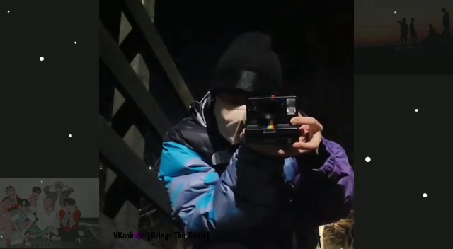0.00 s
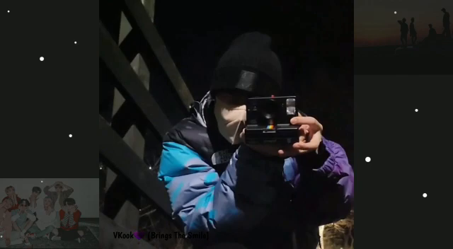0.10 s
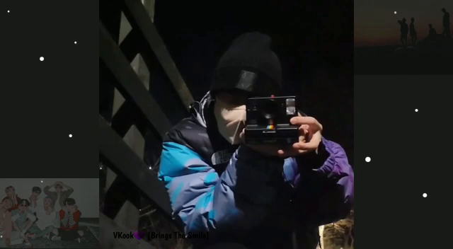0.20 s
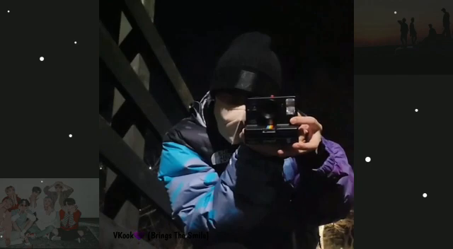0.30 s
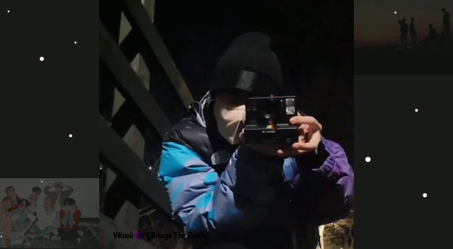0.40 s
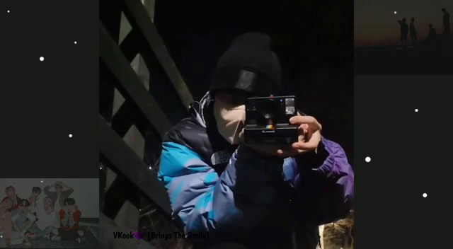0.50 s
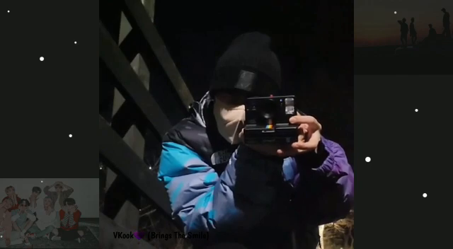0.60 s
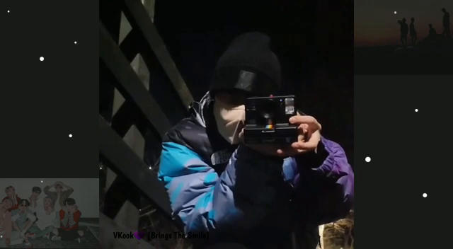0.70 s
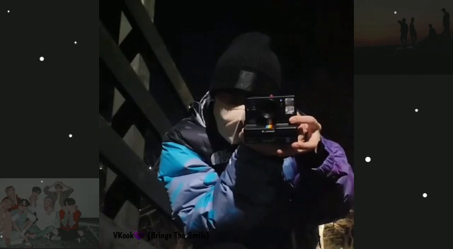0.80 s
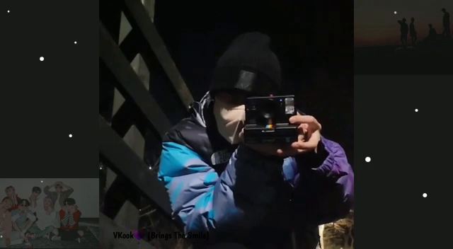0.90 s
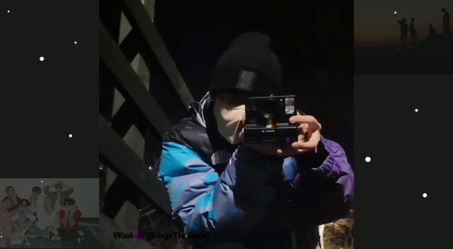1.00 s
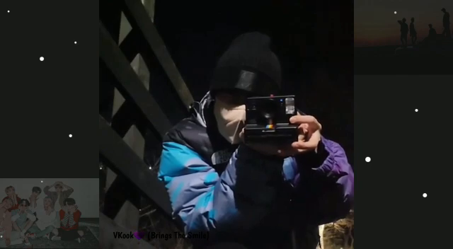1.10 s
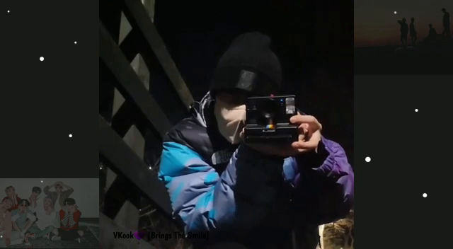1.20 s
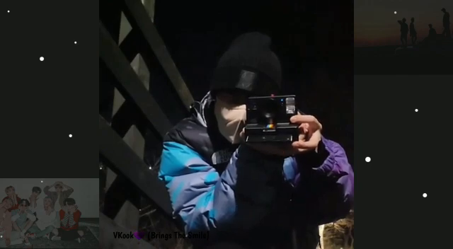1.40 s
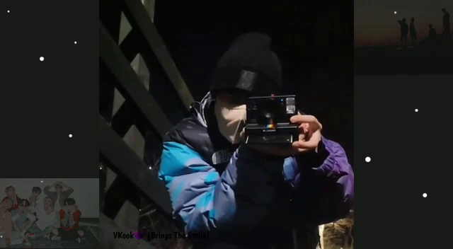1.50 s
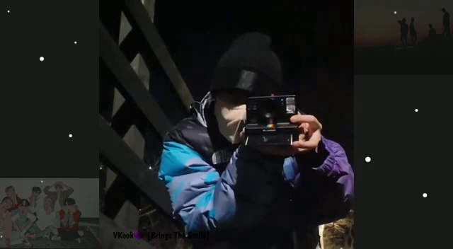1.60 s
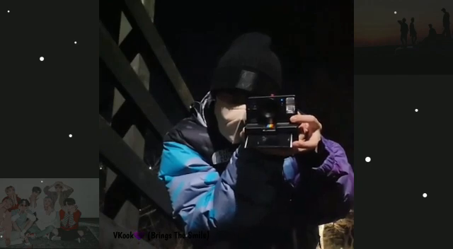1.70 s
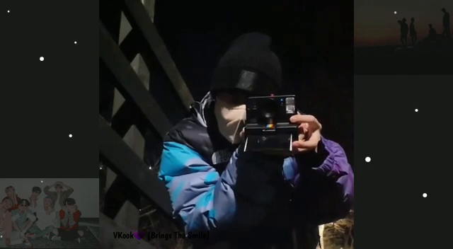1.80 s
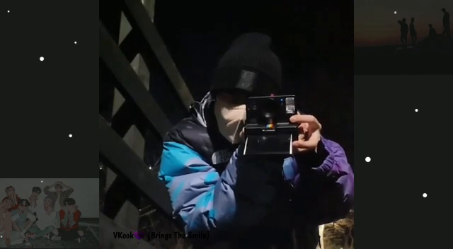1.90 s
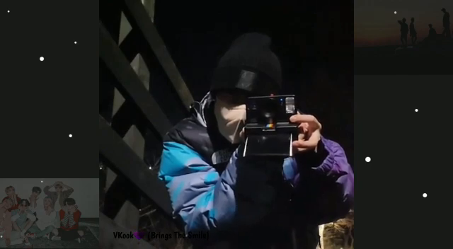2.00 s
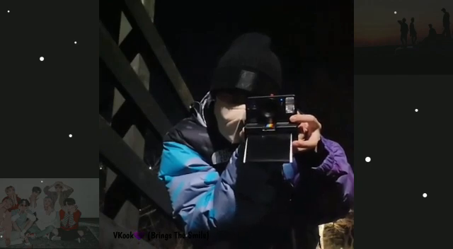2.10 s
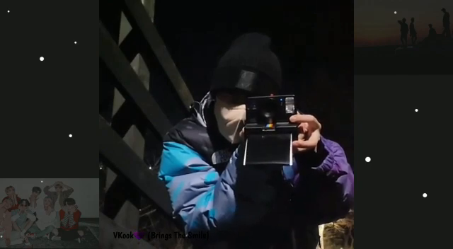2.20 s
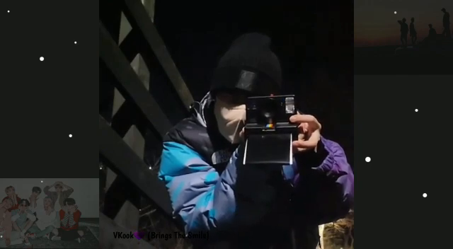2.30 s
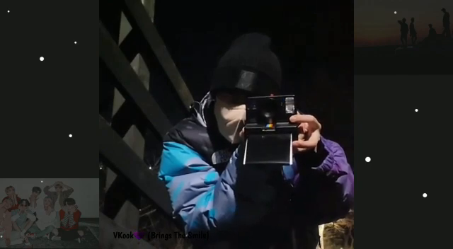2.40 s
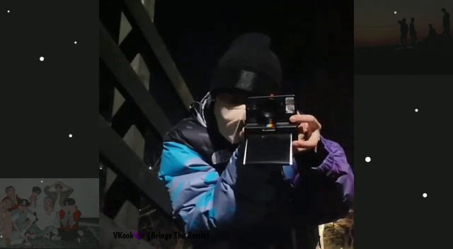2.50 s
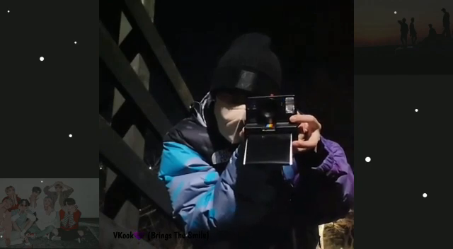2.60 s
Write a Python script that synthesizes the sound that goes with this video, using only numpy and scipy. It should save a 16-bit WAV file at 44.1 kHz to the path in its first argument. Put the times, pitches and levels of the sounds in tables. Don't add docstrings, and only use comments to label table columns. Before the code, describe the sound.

Small geared whine of an instant camera ejecting a print, with crisp plastic clicks, outdoors at night

```python
import sys
import numpy as np
from scipy import signal
from scipy.io import wavfile
from scipy.ndimage import uniform_filter1d, map_coordinates

SR = 44100
rng = np.random.default_rng(int(sys.argv[2]) if len(sys.argv) > 2 else 0)


def generate_wav(sig):
    pcm = np.round(np.clip(np.atleast_2d(sig).T, -1, 1) * 32767).astype(np.int16)
    wavfile.write(sys.argv[1], SR, pcm)


def voltage_ratio(decibels):
    exponent = np.asarray(decibels, float) / 20
    return 10 ** exponent


N = 116865
LEFT_RIGHT = np.array([[1], [-1]])


def unit(x):
    return x / np.sqrt(np.mean(x ** 2))


def band(x, hz, width_hz):
    return signal.lfilter(*signal.iirpeak(hz, hz / max(width_hz, 20), fs=SR), x)


def highpass(x, order, hz):
    return signal.lfilter(*signal.butter(order, hz, "high", fs=SR), x)


def walk(rate_hz):
    hold = int(SR / rate_hz)
    steps = np.repeat(rng.standard_normal(N // hold + 1), hold)
    return unit(uniform_filter1d(uniform_filter1d(steps, hold), hold)[:N])


# (time [s], shaft rate [turns/s], tooth whine [dB], shaft rattle [dB], gear hiss [dB])
MOTOR_COURSE = [(0.501, 187.7, -56, -53, -48), (0.579, 183.8, -54, -51, -46),
                (0.939, 182.4, -49, -55, -46.5), (.972, 140.7, -40, -56.5, -45.5),
                (1.03, 130, -51, -62, -48.5), (1.08, 115, -46.5, -53, -49), (1.171, 117, -46, -70, -49.5),
                (1.22, 127.5, -52, -57, -50.5), (1.26, 111.7, -51, -62, -53), (1.32, 130.1, -53, -85, -47),
                (1.4, 132.8, -46.5, -87, -47), (1.871, 141.9, -49.5, -68, -47),
                (2.225, 150.7, -39, -70, -46), (2.255, 137.1, -45.5, -75, -48.5),
                (2.283, 82.2, -49, -74, -44), (2.312, 123.2, -51, -76, -48.5), (2.35, 170.6, -73, -50, -48),
                (2.4, 184.3, -73, -59.5, -49)]
TOOTH_LINES_DB = [-7, 3, -5.5, 4, -4.5, -0.5, -7, -6.5, -6.5]
SHAFT_ORDERS = [6, 7, 11, 13, 17, 18, 19, 20, 21, 23, 24, 25, 30, 31, 32, 40]
SHAFT_LINES_DB = [-3, -7.5, -5.5, -5, -3.1, -0.6, -6.5, -9.5, -19.5, -2, -5.5, -10, -28, -11, -22, -10]
TEETH = 11
ON_S, ATTACK_S, SPIN_UP_S, START_SHARE = 0.108, 0.022, 0.045, 0.36
OFF_S, COAST_HZ_PER_S, COAST_DB_PER_S = 2.473, 53, 152
SPEED_JITTER, HISS_GATE = 0.00251, 0.2
LINE_FLUTTER_DB, LINE_ROUGH_DB, STEADY_ORDER = 1.1, 2.8, 33
UPPER_SHARE, UPPER_DB = 0.52, -50


def shaft_line(order, db, turn_rad):
    rough_db = max(order / STEADY_ORDER, 1) * LINE_ROUGH_DB
    level_db = db + LINE_FLUTTER_DB * walk(6.54) + rough_db * walk(150)
    return voltage_ratio(level_db) * np.sin(order * turn_rad + 2 * np.pi * rng.random())


def motor(t):
    course = np.array(MOTOR_COURSE).T
    hz, whine_db, rattle_db, hiss_db = (
        uniform_filter1d(np.interp(t, course[0], column), SR // 120) for column in course[1:])
    since_on = np.maximum(t - ON_S, 0)
    since_off = np.maximum(t - OFF_S, 0)
    hz = hz * (1 - START_SHARE * np.exp(-since_on / SPIN_UP_S)) - COAST_HZ_PER_S * since_off
    turn_rad = 2 * np.pi * np.cumsum(hz * (1 + SPEED_JITTER * walk(60))) / SR

    swing_db = whine_db - UPPER_DB
    upper_db = UPPER_DB + UPPER_SHARE * swing_db + np.minimum(swing_db - 2, 0)
    whine = np.zeros(N)
    for k, db in enumerate(TOOTH_LINES_DB):
        whine += voltage_ratio(whine_db if k < 2 else upper_db) * shaft_line(TEETH * (k + 1), db, turn_rad)
    rattle = sum(shaft_line(order, db, turn_rad) for order, db in zip(SHAFT_ORDERS, SHAFT_LINES_DB))

    power = np.clip(since_on / ATTACK_S, 0, 1) ** 2 * voltage_ratio(-COAST_DB_PER_S * since_off)
    hiss = voltage_ratio(hiss_db + 3.5) * (1 + HISS_GATE * np.sin(turn_rad))
    return (whine + voltage_ratio(rattle_db) * rattle) * power, hiss * power, turn_rad / (2 * np.pi)


CLATTER_DB, CLATTER_TURNS, CLATTER_POINTS = -4.5, 5, 150


def clatter(turns):
    surface = rng.standard_normal((600, CLATTER_POINTS))
    surface = uniform_filter1d(surface, size=CLATTER_TURNS, axis=0)
    return unit(map_coordinates(surface, [turns, turns % 1 * CLATTER_POINTS], mode="grid-wrap"))


# (centre [Hz], width [Hz])
ALIKE_BANDS = [(6430, 540), (1770, 390), (3280, 500)]
UNLIKE_DB, UNLIKE_HZ = 2.5, 2275


def port_noise():
    shared = rng.standard_normal(N)
    unlike = highpass(rng.standard_normal((2, N)), 2, UNLIKE_HZ)
    for hz, width_hz in ALIKE_BANDS:
        unlike = unlike - band(unlike, hz, width_hz)
    return shared + voltage_ratio(UNLIKE_DB) * unlike


# (time [s], level [dB], decay T60 [s], shell knock [dB], knock tilt [dB/octave])
SNAP_EVENTS = [(1.0858, -48, 0.012, -3, .1), (1.1018, -36, 0.027, -26, .1), (1.1039, -28, 0.024, -5, -7),
               (1.1054, -28.5, 0.028, -7, 4.5), (1.1118, -35, 0.03, -1.5, 9), (1.123, -38, 0.039, -10, 4),
               (1.139, -35.5, 0.012, -13, 10.5), (1.233, -46.5, 0.043, 3, -10), (1.328, -53, .03, -20, .1),
               (1.438, -53, 0.025, 4, 3), (2.262, -51, 0.033, -5, -19.5), (2.327, -28.5, 0.021, -14, 9),
               (2.3295, -38, 0.013, 8, -7), (2.3324, -54, 0.016, 1, -7), (2.338, -51, 0.019, 14, -5)]
# (frequency [Hz], level [dB], T60 [s])
SHELL_MODES = [(447, -9, 0.01), (851, -5, 0.032), (995, -6.5, 0.043), (1223, -4.5, 0.057),
               (1560, 3.5, 0.013), (2264, 5, 0.031)]
SNAP_RISE_S = 0.0003


def snaps(t):
    crackle, knocks = np.zeros(N), np.zeros(N)
    for start_s, db, t60_s, knock_db, tilt_db in SNAP_EVENTS:
        age = np.maximum(t - start_s, 0)
        rise = np.minimum(age / SNAP_RISE_S, 1)
        crackle += (t >= start_s) * voltage_ratio(db + 7.5 - 60 * age / t60_s) * rise
        for k, (hz, mode_db, ring_s) in enumerate(SHELL_MODES):
            level_db = db + knock_db + mode_db + tilt_db * np.log2(hz / 1000)
            knocks += (-1) ** k * voltage_ratio(level_db - 60 * age / ring_s) * np.sin(2 * np.pi * hz * age)
    return crackle, knocks


# (centre [Hz], width [Hz], left [dB], right [dB], extra left phase lag [rad])
BODY_MODES = [(777, 1000, -18, -4, 0.2), (1125, 290, -3, -8.5, 0.063), (1831, 910, -9.5, -2, 0.87),
              (3428, 855, -1.5, -8, 1.65), (3797, 744, -18.5, 1, -2), (4926, 326, -11.5, -4, -0.92),
              (5740, 670, -3, -3, -0.43), (6495, 1100, -6.5, -7.5, -0.14), (7150, 340, -2, -7, 0.97),
              (7910, 1230, -21.5, -11.5, 1.1), (10350, 2000, -14, -9, -0.24),
              (10940, 930, -6.5, -0.53, -0.0089), (11800, 2400, -15.5, -10, 0.032)]
# (centre [Hz], width [Hz], depth [0-1])
BODY_DIPS = [(1600, 100, 0), (2601, 400, 0.57), (4900, 170, 0.46)]


def body(x, side, flicker):
    for hz, width_hz, depth in BODY_DIPS:
        x = x - depth * band(x, hz, width_hz)
    x = signal.hilbert(x)
    out = 0
    for k, (hz, width_hz, left_db, right_db, lag_rad) in enumerate(BODY_MODES):
        ring = band(band(x, hz, 1.35 * width_hz), hz, 1.35 * width_hz)
        gain = (-1) ** k * voltage_ratio((left_db, right_db)[side]) * flicker[k]
        out = out + gain * np.exp(-1j * lag_rad * (1 - side)) * ring
    return out.real


YARD_T60_S, YARD_DB = 0.15, -19


def yard(near):
    age = np.arange(SR // 3) / SR
    tail = rng.standard_normal((2, len(age))) * voltage_ratio(-60 * age / YARD_T60_S) * (age > 0.004)
    tail = tail / np.sqrt(np.sum(tail ** 2, axis=1, keepdims=True))
    return voltage_ratio(YARD_DB) * signal.fftconvolve(near, tail, axes=1)[:, :N]


# (frequency [Hz], density [dB/Hz])
NIGHT_SPECTRUM = [(30, -34), (40, -10), (52, 8), (64, -7.5), (230, -5), (560, -23.5), (900, -25.5),
                  (1500, -55)]
NIGHT_DB, NIGHT_PAN_DB, NIGHT_SIDE_DB, NIGHT_FLICKER_DB, AIR_DB = -50.5, 0.5, -13, 3, -87


def night():
    table_hz, table_db = np.array(NIGHT_SPECTRUM).T
    rumble = 0
    for hz in 32 * 2 ** np.arange(0, 6, 1 / 3):
        mid, side = (band(band(rng.standard_normal(N), hz, hz / 3), hz, hz / 3) for _ in range(2))
        db = np.interp(np.log(hz), np.log(table_hz), table_db) + NIGHT_FLICKER_DB * walk(6.116)
        side_gain = voltage_ratio(NIGHT_SIDE_DB) * (1 + hz / 600)
        rumble = rumble + voltage_ratio(db) * (mid + side_gain * side * LEFT_RIGHT)
    air = voltage_ratio(AIR_DB) * rng.standard_normal((2, N))
    return voltage_ratio(NIGHT_DB + NIGHT_PAN_DB * LEFT_RIGHT) * unit(rumble) + air


DIRECT_DB, DIRECT_HZ = -17, 3500
HISS_FLICKER_DB, LEFT_LAG_SAMPLES = 2.5, 10


def scene():
    t = np.arange(N) / SR
    lines, hiss, turns = motor(t)
    crackle, knocks = snaps(t)
    noise = port_noise()
    gears = hiss * (noise + voltage_ratio(CLATTER_DB) * clatter(turns))
    snap = noise * crackle
    direct = knocks + voltage_ratio(DIRECT_DB) * highpass(snap, 1, DIRECT_HZ)
    steady = np.ones(len(BODY_MODES))
    flicker = [voltage_ratio(HISS_FLICKER_DB * walk(18)) for _ in BODY_MODES]
    left, right = (body(lines + snap[side], side, steady) + body(gears[side], side, flicker) + direct[side]
                   for side in range(2))
    near = np.array([np.roll(left, LEFT_LAG_SAMPLES), right])
    return near + yard(near) + night()


SQUELCH_BINS, SQUELCH_REACH, SQUELCH_FRAME = 4, 11, 1024
SQUELCH_FROM_HZ, SQUELCH_TOP_HZ = 1500, 11300
SQUELCH_DB, SQUELCH_CROSS_DB, SQUELCH_TOP_DB = -10.5, -6, -87


def squelch(x):
    turn = np.array([[1, 1], [1, -1]]) / np.sqrt(2)
    padded = np.pad(x, ((0, 0), (0, SQUELCH_FRAME)), mode="reflect", reflect_type="odd")
    hz, _, z = signal.stft(turn @ padded, SR, nperseg=SQUELCH_FRAME)
    hz = hz[1::SQUELCH_BINS, None]
    power = (np.abs(z[:, 1:]) ** 2).reshape(2, -1, SQUELCH_BINS, z.shape[2]).mean(axis=2)
    power = uniform_filter1d(power, size=3, axis=2) + 1e-18
    active = hz > SQUELCH_FROM_HZ
    around = uniform_filter1d(power.mean(axis=0) * active, size=SQUELCH_REACH, axis=0)
    limit = (around * voltage_ratio(2 * SQUELCH_DB) + power[::-1] * voltage_ratio(2 * SQUELCH_CROSS_DB)) * active
    limit = limit + voltage_ratio(2 * SQUELCH_TOP_DB) * (hz > SQUELCH_TOP_HZ)
    keep = np.repeat(1 / (1 + (limit / power) ** 10), SQUELCH_BINS, axis=1)
    keep = np.pad(keep, ((0, 0), (1, 0), (0, 0)), mode="edge")
    return turn @ signal.istft(z * keep, SR, nperseg=SQUELCH_FRAME)[1][:, :N]


def top_cut(x):
    return signal.sosfilt(signal.butter(12, 14210, fs=SR, output="sos"), x)


TOP_HZ, TOP_DROP_DB = 12720, -22


def record(dry):
    lowpass = signal.ellip(5, 0.2, 30, TOP_HZ, fs=SR, output="sos")
    low = signal.sosfiltfilt(lowpass, dry)
    mix = squelch(low + voltage_ratio(TOP_DROP_DB) * (dry - low))
    return top_cut(mix)


dry = scene()
out = record(dry)
generate_wav(out)
```